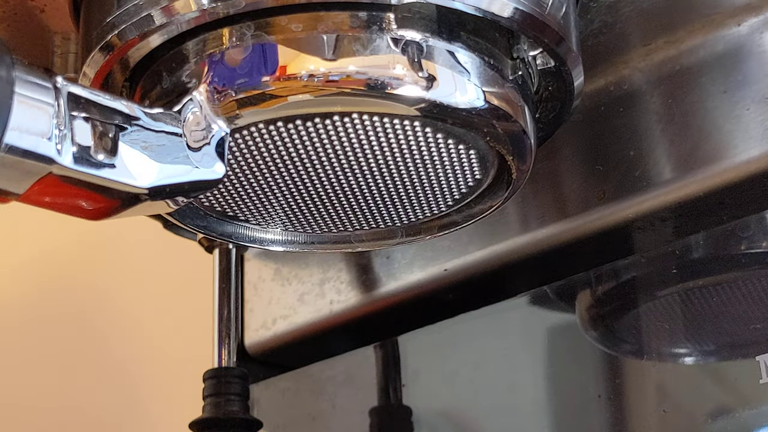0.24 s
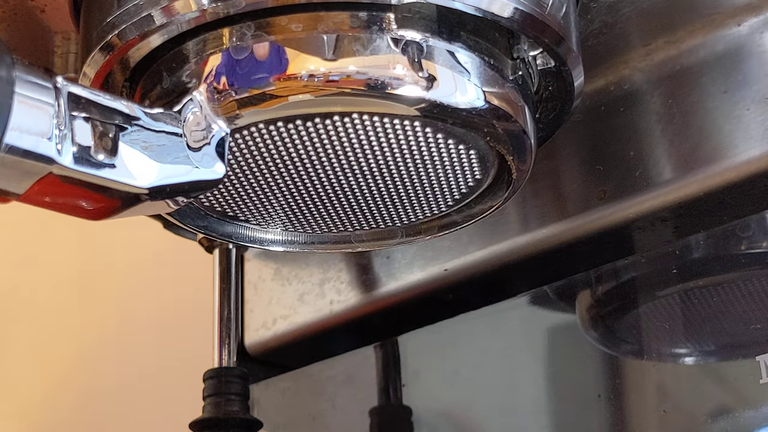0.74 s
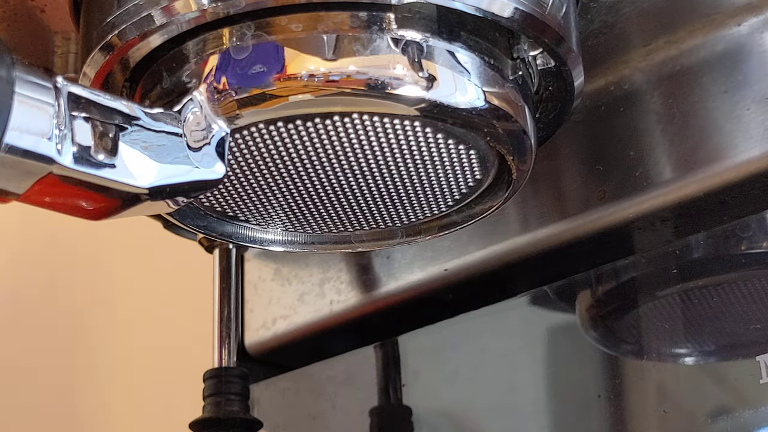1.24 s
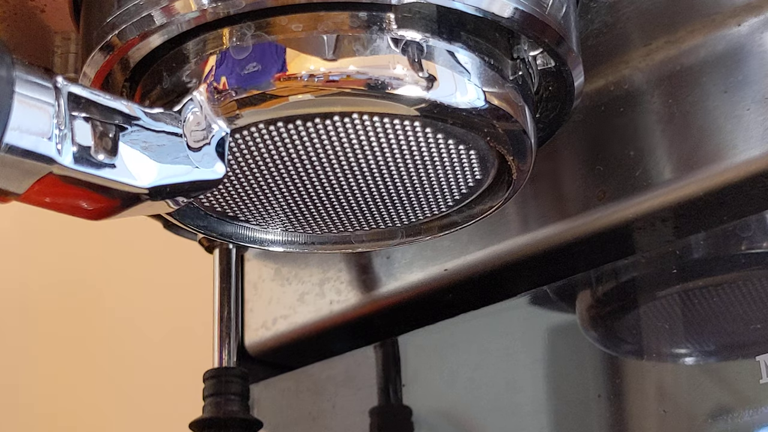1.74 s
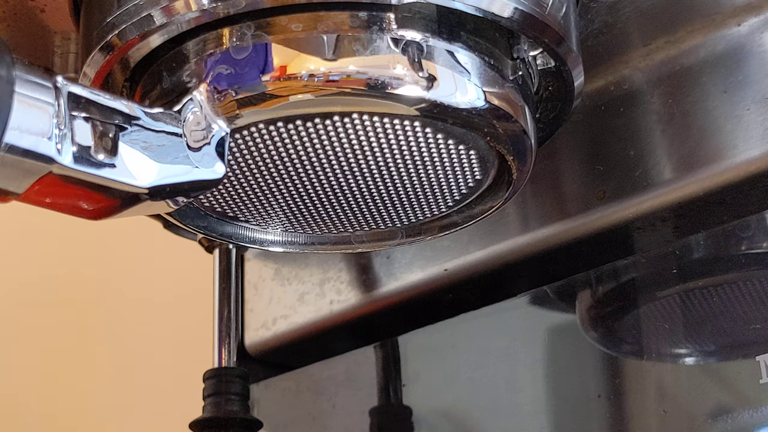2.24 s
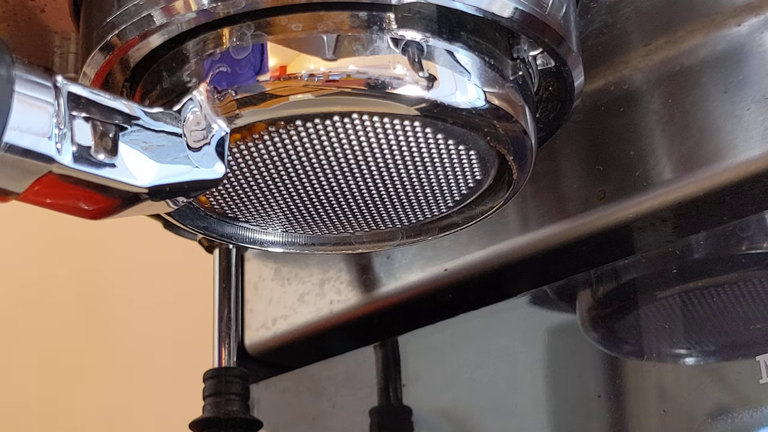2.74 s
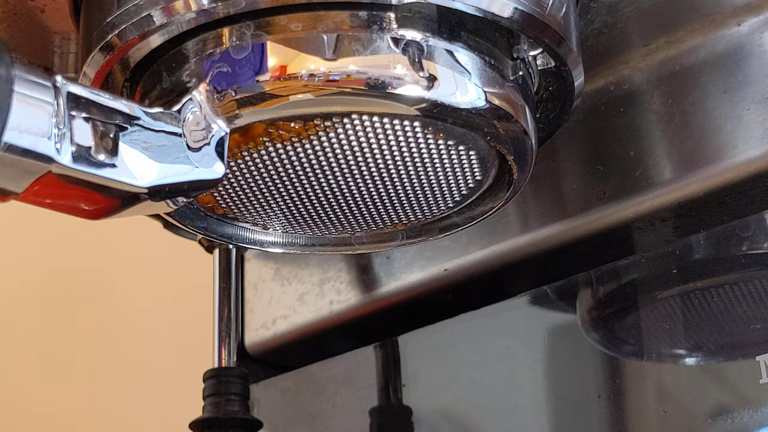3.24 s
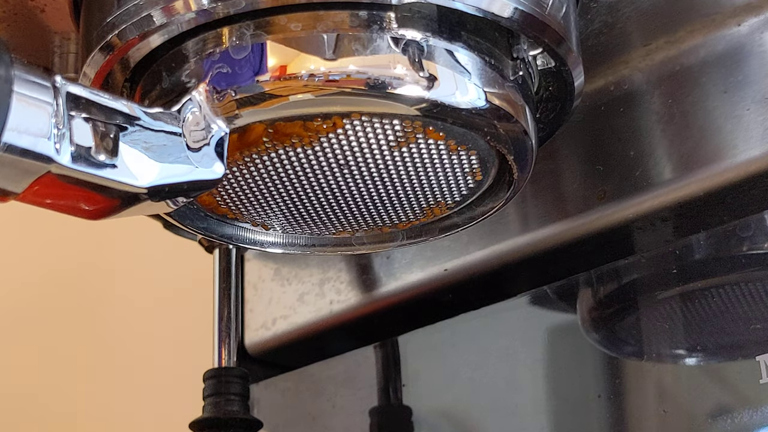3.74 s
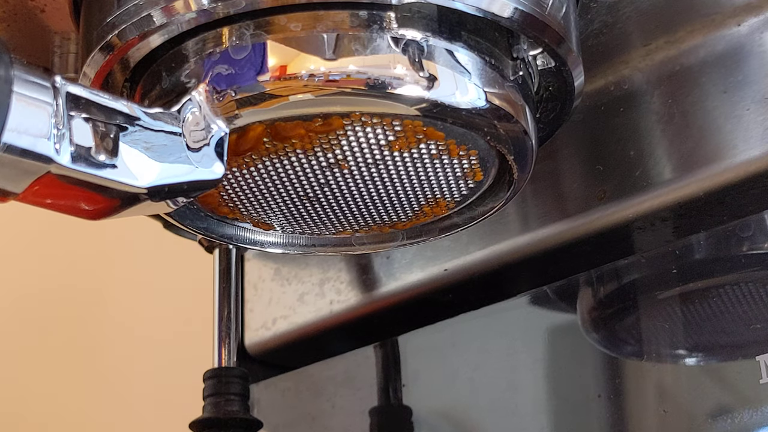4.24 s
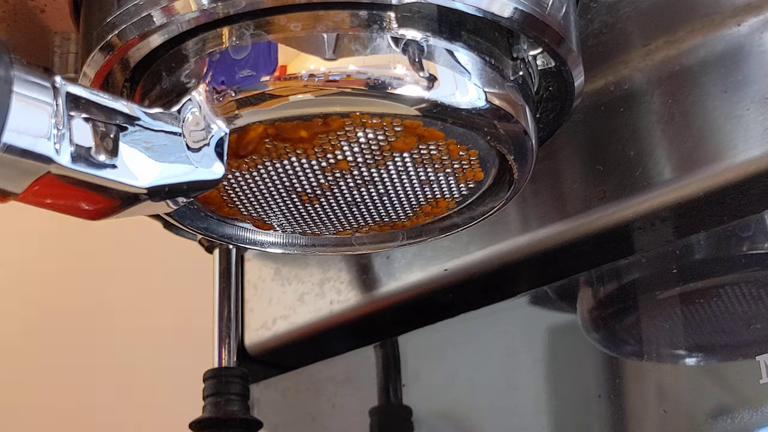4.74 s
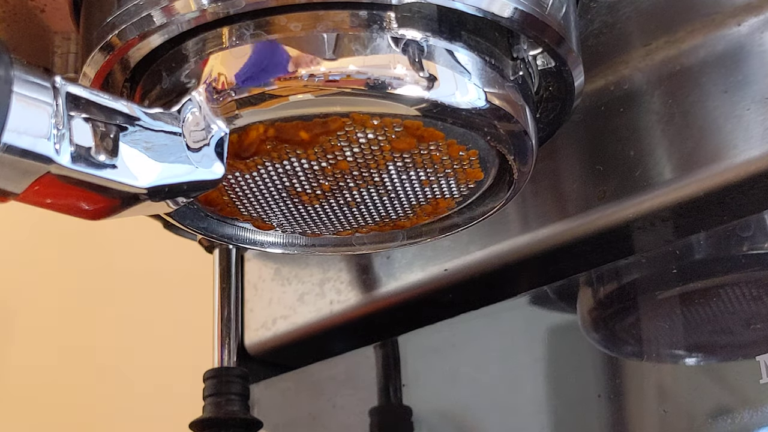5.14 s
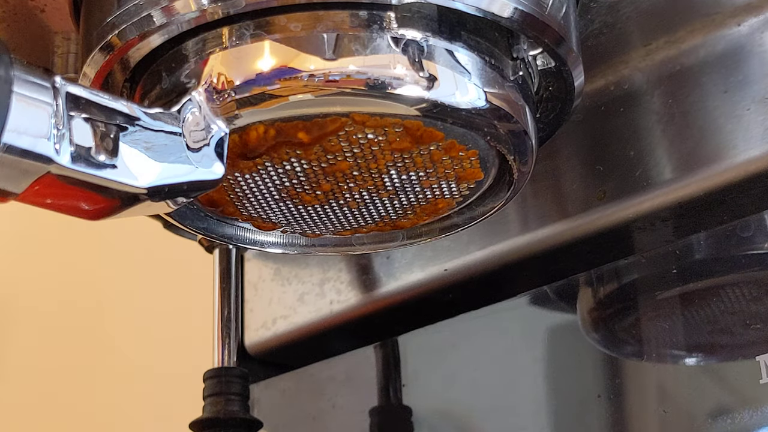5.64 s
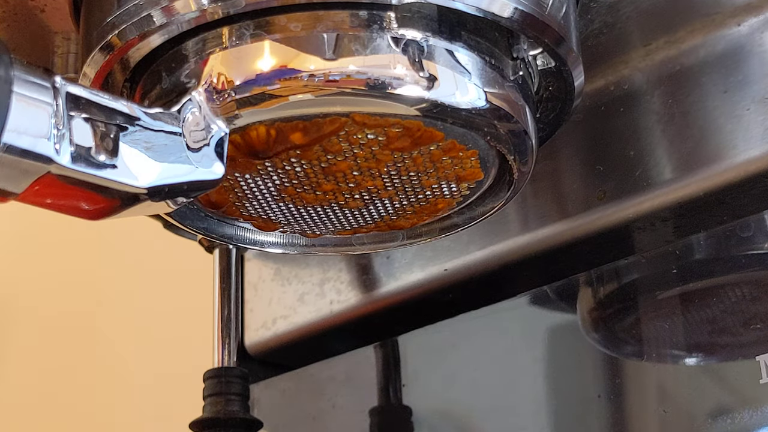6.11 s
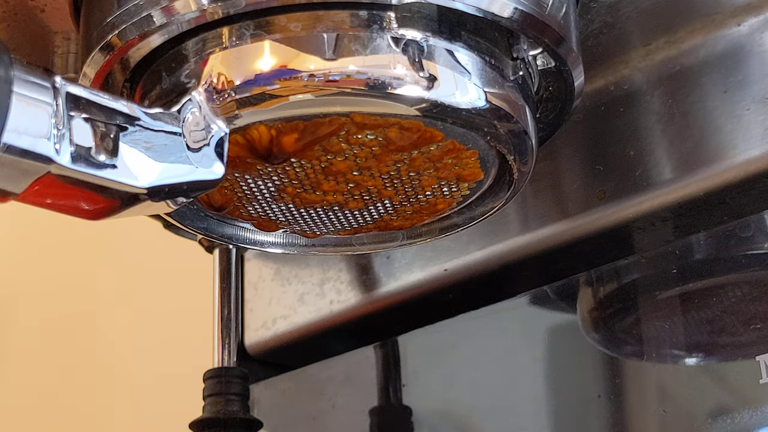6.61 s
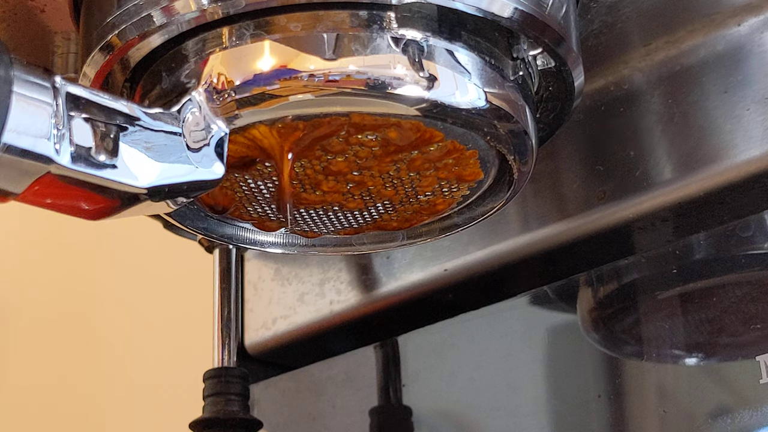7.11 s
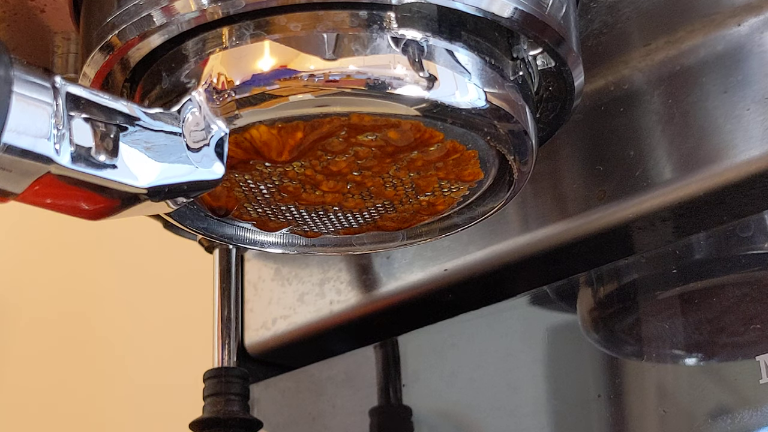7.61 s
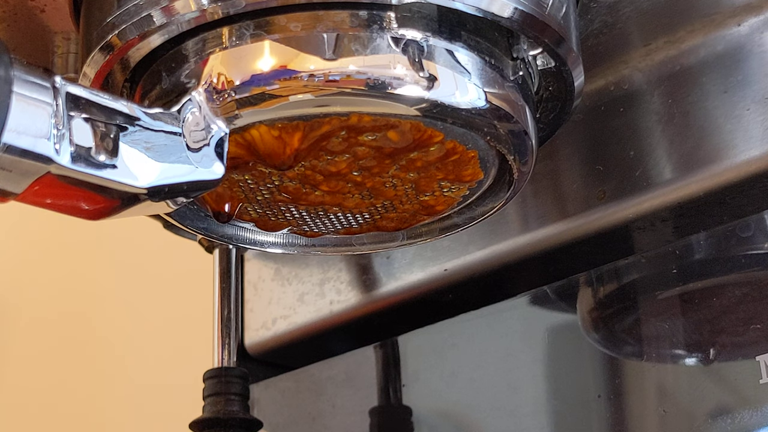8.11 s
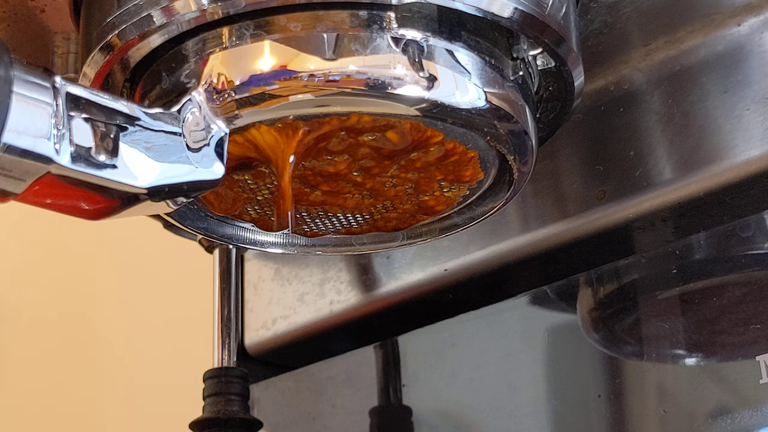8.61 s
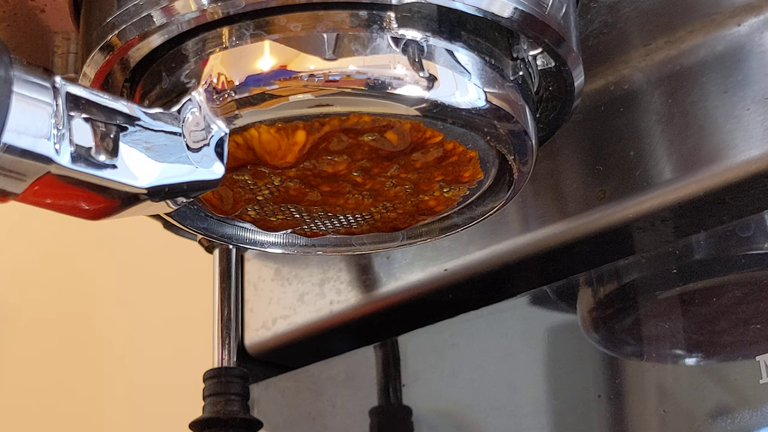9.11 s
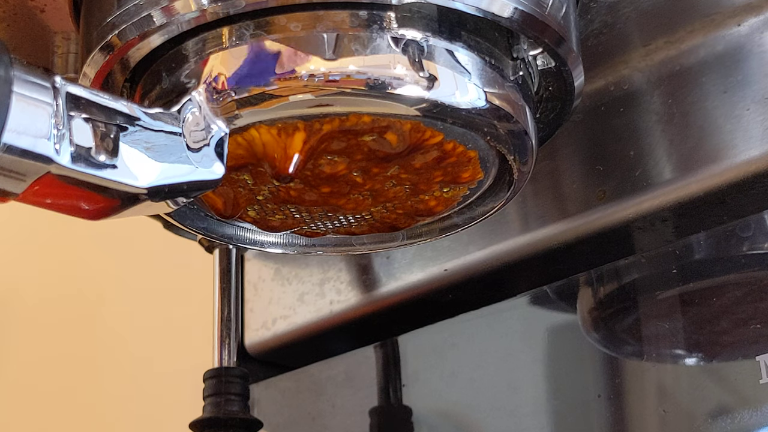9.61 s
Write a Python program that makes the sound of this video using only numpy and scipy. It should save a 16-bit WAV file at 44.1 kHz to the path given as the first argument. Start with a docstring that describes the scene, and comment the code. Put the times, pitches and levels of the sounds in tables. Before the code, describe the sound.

An espresso machine's pump is heard very close. It starts at full buzz, a low mains-rate hum with case rattle, snapping valve and bright pulsing hiss, plus a faint high sizzling ring. Around three seconds the tone bends and the rattle fades, leaving a quieter, steady buzz with softer hiss and low water churn until the end. A few dull bumps occur. Close stereo pickup, little room.

```python
"""The vibrating pump of an espresso machine, heard from close to the filter basket.
At first the pump runs free, one piston stroke per mains cycle: the case hums and rattles loudly, the valve
snaps and spurts hiss on every stroke, and a loose fitting sings for a few seconds. Soft bumps come now and then.
As pressure builds against the coffee, the hum shifts in pitch colour and the rattle dies away.
A quiet buzz remains, with a softer spurt of hiss on every stroke and a low churning of water."""
import sys
import numpy as np
from scipy import signal
from scipy.fft import rfft, irfft, next_fast_len
from scipy.io import wavfile
from scipy.ndimage import uniform_filter1d, map_coordinates

SR = 44100
rng = np.random.default_rng(int(sys.argv[2]) if len(sys.argv) > 2 else 0)


def dump(signal):
    """Clip the signal to [-1, 1] and save it as 16-bit WAV at the path in sys.argv[1]."""
    limited = np.clip(np.atleast_2d(signal).T, -1, 1)
    pcm = np.round(limited * 32767).astype(np.int16)
    wavfile.write(sys.argv[1], SR, pcm)


N = 434826
T = np.arange(N) / SR  # time in seconds
FFT_SIZE = next_fast_len(N, True)
BINS = np.fft.rfftfreq(FFT_SIZE, 1 / SR)  # pitches of the spectrum in Hz

MAINS_HZ = 49.97
EDGE_HZ = 15900  # upper limit of the sound

# Water pressure over time: time_s, pressure_0_to_1
PRESSURE = [(0, 0), (1.3, .1), (3.5, .7), (5, .86), (9.86, 1)]
# Water first cushions the piston, then loads it: pressure where each is half done, and its spread
CUSHION_AT, CUSHION_SPREAD = 0.31, 0.071
LOAD_AT, LOAD_SPREAD = 0.61, 0.058

# Hum lines of the case running free: multiple_of_stroke_rate, level_db (relative to FREE_DB)
FREE_LINES = [(1, -18.5), (1.5, -21), (2, 0), (3, -1.5), (4, -4.5), (4.5, -5), (5, 2), (6, -5),
              (6.5, -15.5), (7, -8), (8, -20), (8.5, -18.5), (10, -8.5), (11, -5), (11.5, -13.5),
              (12, -9.5), (12.5, -11), (14, -16), (15, -8.5)]
FREE_DB = -40
# Hum lines under load: multiple_of_stroke_rate, level_db (relative to LOADED_DB)
LOADED_LINES = [(1, -12), (2, 0), (3, -7), (4, -12), (5, -5), (6, -13), (7, -14), (8, -18), (9, -18),
                (10, -17), (11, -15), (12, -15), (13, -14), (14, -14), (15, -11), (16, -9), (17, -14),
                (18, -12), (19, -17), (20, -7), (21, -9), (22, -25), (23, -17), (24, -20), (25, -24),
                (26, -17), (27, -23), (28, -26), (29, -28), (30, -31), (31, -24), (32, -37), (33, -20),
                (34, -28), (35, -24), (36, -24), (37, -32), (38, -24), (39, -32), (40, -32)]
LOADED_DB = -49
# Lines of the bare piston, which change as soon as it is cushioned: multiple_of_stroke_rate
BARE_LINES = (2, 4, 11, 12)
# When each pitch arrives within a stroke, and how the panels scatter it:
# pitch_hz, free_share_of_stroke, loaded_share_of_stroke, scatter_radians
ARRIVAL = [(50, 0.012, 0, 0), (99, 0.035, 0.006, 0.5), (150, .3, -0.007, 0.61), (242, .55, -0.042, 1.05),
           (334, 0.44, 0.043, 1.04), (449, 0.42, 0.305, 2), (632, 0.485, 0.395, 1.6),
           (747, 0.454, .42, 0.6), (1044, .46, 0.444, 0.35), (1170, 0.284, 0.241, 1.3),
           (2000, .15, 0.192, 1.6)]
# Pressure makes the case boom or cancel at some pitches in turn:
# pitch_hz, width_hz, pressure_0_to_1, pressure_spread, lift_db
BOOMS = [(350, 28, 0.32, 0.14, 7.5), (258, 33, 0.46, 0.12, 3.5), (300, 41, .4, 0.067, -14),
         (316, 62, .54, 0.089, 6.5), (743, 130, 0.63, 0.11, 10.5), (1365, 79, 0.61, .2, 14),
         (1000, 25, 0.53, 0.29, 9), (252, 29, 0.773, .05, -8), (850, 25, 0.825, .13, 10)]

# Colour of the valve snap: pitch_hz, relative_level_db
SNAP = [(1900, -30), (2050, -2), (2200, -12), (2420, 3), (2650, -7), (2900, 2), (3150, -1), (3400, -14),
        (3620, -4), (3750, -10), (4250, -2), (4900, 1), (6000, -8), (12000, -16)]
# Pings of the valve body as it snaps: pitch_hz, decay_s, level_db (before its quick rise and decay)
PINGS = [(2477, 0.0026, -54.5), (4070, .002, -42.5)]

# Flow through one stroke, from the opening of the valve: share_of_stroke, level_db
SPURT = [(0, -6), (.06, -2.5), (.22, 0), (.34, -1.5), (.5, -6), (.68, -10), (.85, -12.5), (.94, -11.5),
         (1, -6)]
# Colour of the hiss running free: pitch_hz, relative_level_db
JET_FREE = [(1760, -43), (3000, -5), (3330, -16), (3960, -8), (4750, -7.5), (5120, -5.5), (6580, -3),
            (7200, 1.5), (8340, -2.5), (9990, 1), (10800, -3.5), (12000, 3), (15800, -11.5)]
# Colour of the hiss under load: pitch_hz, relative_level_db
JET_LOADED = [(1760, -9), (3000, -9.5), (3500, -9.5), (3990, -6), (4400, -2.5), (4780, -4.5), (5610, -4.5),
              (7150, 3), (8340, -3), (9000, 2), (10700, 1), (12000, 4.5), (13400, 2), (15200, -4),
              (15800, -11)]
# Resonances and dips of the steel fittings: pitch_hz, width_hz, lift_db
FITTINGS = [(3700, 160, 5.5), (6840, 650, -2.5), (6980, 71, 5.5), (8960, 140, 3), (9710, 90, -3.5),
            (10820, 350, -4.5), (10600, 73, 0.5), (11500, 53, 6), (11950, 230, -9), (13500, 300, -19)]
# The hiss flares as the valve gap changes: pitch_hz, width_hz, pressure_0_to_1, pressure_spread, lift_db
FLARES = [(12600, 910, 0.023, .03, 1.5), (11100, 1500, 0.3, .08, 5), (6940, 1200, 0.47, .11, 4),
          (3030, 450, .45, .11, 4), (9900, 500, 0.66, .2, 5.5)]
# Hiss level running free (dB), its change at full load (dB), its growth under load (dB per unit of pressure)
JET_DB, JET_DROP_DB, JET_GROWTH_DB = -38.5, -9.5, 6

# Loose rattle of the case, before its looseness acts: pitch_hz, level_db_per_hz
RATTLE = [(25, -95), (60, -85), (160, -75), (230, -77), (420, -76.5), (590, -70.5), (700, -73),
          (1400, -74.5), (1560, -84), (1950, -78), (3000, -84), (3600, -84.5), (6000, -100)]
# Churning water: pitch_hz, level_db_per_hz
CHURN = [(20, -100), (50, -84), (122, -79.5), (160, -79.5), (200, -80.5), (235, -73.5), (320, -82),
         (450, -86), (610, -81), (820, -87.5), (1100, -91), (1330, -92.5), (1550, -98.5), (2100, -100),
         (3300, -106.5), (8000, -108)]
# Soft bumps in the machine: start_s, pitch_hz, level_db (before rise and decay), decay_s
BUMPS = [(.15, 325, -30, 0.026), (.75, 38, -45, .06), (3.401, 127, -34, 0.021), (3.47, 38, -48, .06),
         (3.809, 154, -51, .05), (4.74, 155, -39, 0.059), (7.642, 167, -44, 0.03), (7.65, 337, -39, 0.02),
         (9.54, 36, -53, 0.053)]

# Balance of the two microphones: pitch_hz, left_minus_right_db
TILT = [(50, -9), (75, -3), (100, 1), (150, 7.5), (260, 4.4), (450, 1.4), (750, 1.8), (1100, 0.6),
        (2000, 2.9), (5500, 2.4), (9000, 6.3), (15000, 3.5)]
# Likeness of the noise at the two microphones: pitch_hz, likeness_0_to_1
SAME = [(50, 0.43), (300, 0.71), (700, .97), (1300, 0.5), (2400, 0.35), (4400, 0.35), (15000, 0.38)]
# Standing waves put the hum out of step at the microphones: pitch_hz, left_lead_radians
SKEW = [(50, 0.54), (100, -0.51), (150, 0.64), (200, -0.91), (250, -0.53), (300, -0.44), (500, -0.48),
        (850, -0.57), (1050, 0.89), (2000, 0.13)]
# Reflections off the steel turn the phase fully from this pitch up; width of one turn
GLINT_FROM_HZ, GLINT_WIDTH_HZ = 2400, 130


def amp(db):
    """Turns decibels into gain."""
    return 10 ** (np.asarray(db) / 20)


def curve(rows, at):
    """Joins the rows of a table by straight lines."""
    return np.interp(at, *np.transpose(rows))


def read(points, hz):
    """Reads a table by pitch, with straight lines on a log-frequency axis."""
    f, value = np.transpose(points)
    return np.interp(np.log(hz + 1), np.log(f + 1), value)


def evened(x):
    """Scales a sound so that the mean of its channels has an rms of 1."""
    mono = np.atleast_2d(x).mean(0)
    return x / np.sqrt(np.mean(mono ** 2) + 1e-20)


def wander(per_s, at):
    """Draws a smooth random curve from random points of unit spread."""
    knots = rng.standard_normal(int(per_s * N / SR) + 4)
    return map_coordinates(knots, [at * per_s], order=3, mode="nearest")


def onset(pressure, at, spread):
    """Steps smoothly from 0 to 1 as the pressure passes a value."""
    return .5 + .5 * np.tanh((pressure - at) / (2 * spread))


def tuned_db(table, hz, pressure):
    """Lifts pitches that each speak only around one pressure; gives pitches x moments."""
    lift_db = 0
    for centre, width, at, spread, lift in table:
        near_pitch = np.exp(-(2 * (hz - centre) / width) ** 2)
        near_pressure = np.exp(-((pressure - at) / spread) ** 2)
        lift_db = lift_db + lift * np.outer(near_pitch, near_pressure)
    return lift_db


def per_stroke(turns, spread_db):
    """Gives each stroke its own random strength."""
    stroke = np.floor(turns - np.floor(turns.min())).astype(int)
    return amp(spread_db * rng.standard_normal(N // 400))[stroke]


def sides(hz):
    """Finds the left and right gain of a pitch."""
    ratio = amp(read(TILT, np.atleast_1d(hz)))
    return 2 * np.array([ratio, np.ones_like(ratio)]) / (1 + ratio)


def radiate(pair, db):
    """Colours two independent sounds and blends them into what the two microphones pick up."""
    a, b = rfft(pair, FFT_SIZE)
    same = np.clip(read(SAME, BINS), -1, 1)
    turn = np.interp(BINS / GLINT_WIDTH_HZ, np.arange(256), rng.standard_normal(256))
    glint = np.exp(2j * turn * np.minimum(BINS / GLINT_FROM_HZ, 1) ** 2)
    right = same * glint * a + np.sqrt(1 - same ** 2) * b
    return irfft(np.array([a, right]) * sides(BINS) * amp(db), FFT_SIZE)[:, :N]


def hum(turns, pressure, cushion, load, half_db=-26, rock_db=-9, knock_free_db=-4, waver=0.14, loose_waver=0.17):
    """Adds lines of the stroke rate; rocking on the mounts adds half lines, strongest running free."""
    t = T[::256]  # slow controls need few points
    free, loaded = dict(FREE_LINES), dict(LOADED_LINES)
    loaded[4.5] = rock_db  # the mounts keep rocking at their own resonance

    # Summing the arrival times over pitch gives each line's lag in turns
    hz, free_arrival, loaded_arrival, scatter = np.transpose(ARRIVAL)
    grid = np.arange(1, 2 * len(LOADED_LINES) + 1) / 2
    free_lag = np.cumsum(np.interp(grid * MAINS_HZ, hz, free_arrival)) / 2
    loaded_lag = np.cumsum(np.interp(grid * MAINS_HZ, hz, loaded_arrival)) / 2
    slip = (free_lag - loaded_lag + .5) % 1 - .5  # each line slides the short way round
    stray = np.interp(grid * MAINS_HZ, hz, scatter) * rng.standard_normal(len(grid))

    angle = (2 * np.pi * (turns % 2)).astype(np.float32)  # two strokes, so half lines fit
    pressure, cushion, load = (np.interp(t, T, control) for control in (pressure, cushion, load))
    out = np.zeros((2, N))
    for k in sorted({*free, *loaded}):
        settled_db = LOADED_DB + loaded.get(k, half_db)
        # Lines missing from the free table are softer without load
        free_db = FREE_DB + free[k] if k in free else settled_db + knock_free_db
        settled = cushion if k in BARE_LINES else load
        db = settled * settled_db + (1 - settled) * free_db
        db = db + tuned_db(BOOMS, k * MAINS_HZ, pressure)[0]
        unrest = (waver + loose_waver * (1 - load)) * min(k / max(free), 1)  # high lines waver most
        gain = np.sqrt(2) * np.interp(T, t, amp(db + 3.5 * unrest * wander(10, t)))
        row = round(2 * k) - 1
        lag = loaded_lag[row] + slip[row] * (1 - load)
        shift = stray[row] + unrest * wander(5, t) - 2 * np.pi * lag
        phase = k * angle + np.interp(T, t, shift).astype(np.float32)
        skew = np.float32([[.5], [-.5]]) * np.float32(read(SKEW, k * MAINS_HZ))
        out += sides(k * MAINS_HZ) * gain * np.cos(phase + skew)
    return out


def valve(turns, level_db=-61, at=.08, ring=0.078, linger=1.0, uneven_db=1.5):
    """Repeats one metallic snap every stroke, a fine comb of lines, plus a short ping of varying strength."""
    length = round(SR / MAINS_HZ)
    share = np.arange(length) / length
    snap = rfft(rng.standard_normal((2, length)) * (np.exp(-share / ring) + linger))
    snap = irfft(snap / abs(snap), length)  # an impact drives all pitches alike
    since = (turns - at) % 1  # share of a stroke since the snap
    train = np.array([map_coordinates(s, [since * length], order=3, mode="grid-wrap") for s in snap])
    colour_db = read(SNAP, BINS) - 60 * (BINS < SNAP[0][0])  # almost nothing below the first row

    age = since / MAINS_HZ  # seconds since the snap
    ping = np.zeros((2, N))
    for hz, decay, db in PINGS:
        shape = np.exp(-age / decay) * (1 - np.exp(-2 * age / decay))
        ping += sides(hz) * amp(db) * shape * np.sin(2 * np.pi * hz * age)
    return evened(radiate(train, colour_db)) * amp(level_db) + ping * per_stroke(turns - at, uneven_db)


def jet_colour(x, pressure, load, ripple_db=2.17):
    """Colours hiss by the fittings, ripples it by short echoes off steel, and flares it at the valve gap."""
    hz, t, z = signal.stft(x, SR, nperseg=1024)
    pressure, load = np.interp(t, T, pressure), np.interp(t, T, load)
    db = np.outer(read(JET_FREE, hz), 1 - load) + np.outer(read(JET_LOADED, hz), load)
    for centre, width, lift in FITTINGS:
        db += (lift / (1 + (2 * (hz - centre) / width) ** 2))[:, None]
    db += tuned_db(FLARES, hz, pressure)
    ripple = evened(uniform_filter1d(rng.standard_normal(len(hz)), size=2))
    gain = amp(db + ripple_db * ripple[:, None])
    gain /= np.sqrt(np.mean(gain ** 2, axis=0))  # colour alone, without changing the loudness
    return signal.istft(z * gain, SR, nperseg=1024)[1][:, :N]


def jet(turns, pressure, load, opens=0.014, stroke_db=1.0, grain_db=1.5, free_depth=1.08):
    """Squirts water through the valve each stroke: grainy hiss, louder and a little sharper running free."""
    phase = turns - opens
    depth = load + free_depth * (1 - load)
    flow = amp(curve(SPURT, phase % 1) * depth) * per_stroke(phase, stroke_db)
    grains = amp(grain_db * np.repeat(rng.standard_normal(N // 32 + 1), 32)[:N])  # steps of 32 samples
    drive = radiate(rng.standard_normal((2, N)) * flow * grains, 0)
    db = JET_DB + load * (JET_DROP_DB - JET_GROWTH_DB * (1 - pressure))
    return evened(jet_colour(drive, pressure, load)) * amp(db)


def sizzle(hz=3950, width_hz=190, level_db=-51, fade_s=2.27):
    """Sings like a loose fitting: a narrow band of noise that fades away over the first seconds."""
    ring_db = -20 * np.log10(1 + (2 * (BINS - hz) / width_hz) ** 2)
    song = evened(radiate(rng.standard_normal((2, N)), ring_db))
    return song * amp(level_db) * np.exp(-(T / fade_s) ** 2)


def shaken(turns, colour, peak, depth, stroke_db):
    """Makes noise that swells once a stroke, each time with another strength, for rattle and churn."""
    throb = (1 + depth * np.cos(2 * np.pi * (turns - peak))) * per_stroke(turns - peak + .5, stroke_db)
    noise = rng.standard_normal((2, N)) * evened(throb)
    return radiate(noise, read(colour, BINS)) * np.sqrt(SR / 2)  # makes the table read as dB per Hz


def case_rattle(turns, cushion, load, level_db=1.17, cushioned_db=-3.0, stilling=0.99):
    """Shakes the loose case as noise, which the cushion softens and the load stills."""
    looseness = amp(level_db + cushioned_db * cushion) * (1 - load) ** stilling
    return shaken(turns, RATTLE, peak=0.46, depth=0.1, stroke_db=1.04) * looseness


def water_churn(turns):
    """Churns water as low noise throughout, plain to hear once the louder rattle has gone."""
    return shaken(turns, CHURN, peak=1.0, depth=0.15, stroke_db=0.2)


def bumps(rise_s=0.016, push_db=-2):
    """Makes dull, quickly dying thuds from a short ring and a broad low push of noise."""
    out = np.zeros((2, N))
    t = np.arange(SR // 3) / SR
    for start, hz, db, decay in BUMPS:
        band = signal.butter(2, [hz / 2, 2 * hz], "bandpass", fs=SR, output="sos")
        push = evened(signal.sosfilt(band, rng.standard_normal(len(t))))
        body = np.sin(2 * np.pi * hz * t) + amp(push_db) * push
        thud = amp(db) * (1 - np.exp(-t / rise_s)) * np.exp(-t / decay) * body
        part = out[:, round(start * SR):][:, :len(t)]
        part += sides(hz) * thud[:part.shape[1]]
    return out


def scene(load_lag=.12):
    """Beats with the mains; rising pressure cushions the piston, then loads it and shifts the valve's timing."""
    pressure = curve(PRESSURE, T)
    cushion = onset(pressure, CUSHION_AT, CUSHION_SPREAD)
    load = onset(pressure, LOAD_AT, LOAD_SPREAD)
    turns = MAINS_HZ * T  # strokes so far
    valve_turns = turns + load_lag * (1 - load)  # the valve acts later under load
    pump = hum(turns, pressure, cushion, load) + case_rattle(turns, cushion, load)
    water = valve(valve_turns) + jet(valve_turns, pressure, load) + water_churn(turns)
    return pump + water + sizzle() + bumps()


def record(dry):
    """Cuts the sound off steeply above its upper limit."""
    lowpass = signal.firwin(511, EDGE_HZ, window=("kaiser", 9), fs=SR)
    return signal.oaconvolve(dry, lowpass[None], "same")


dry = scene()
out = record(dry)
dump(out)
```